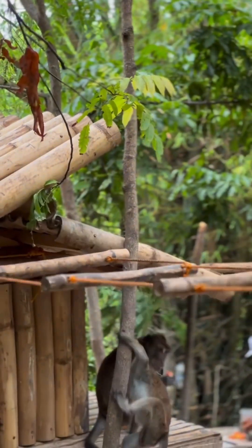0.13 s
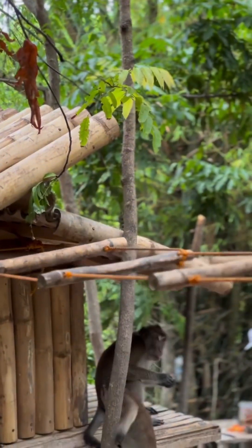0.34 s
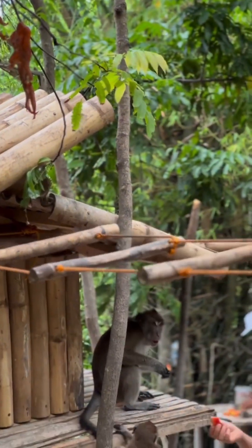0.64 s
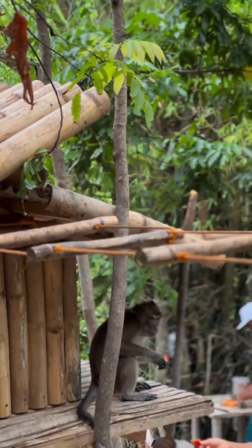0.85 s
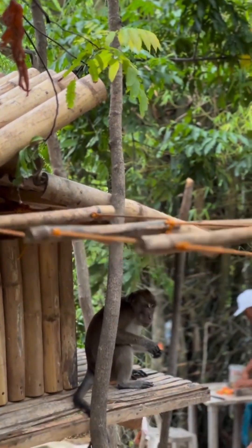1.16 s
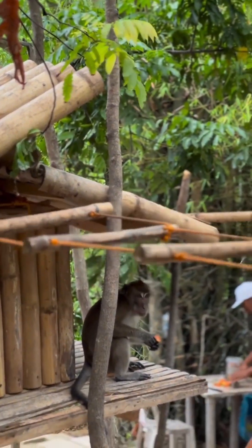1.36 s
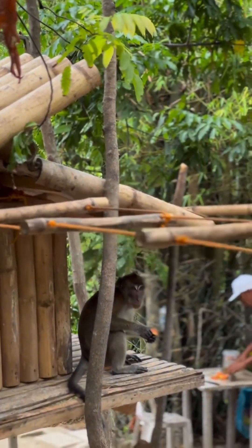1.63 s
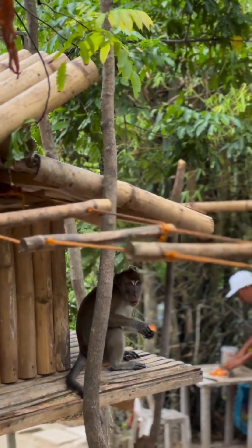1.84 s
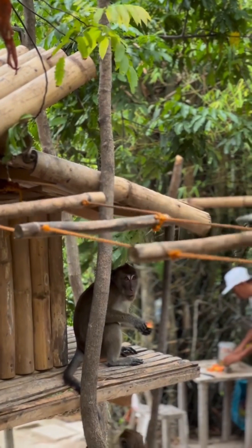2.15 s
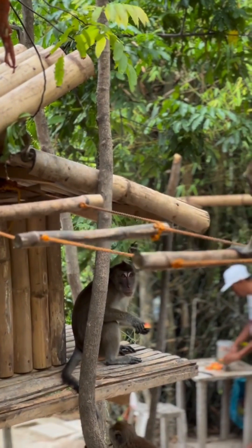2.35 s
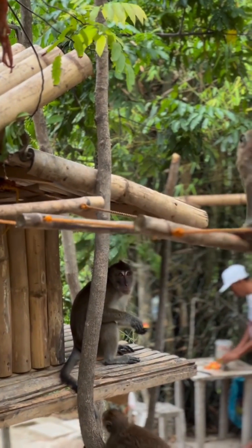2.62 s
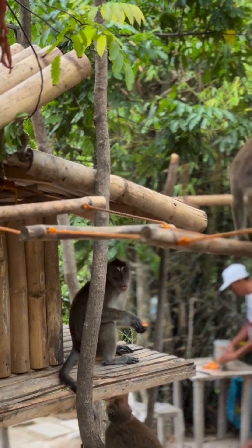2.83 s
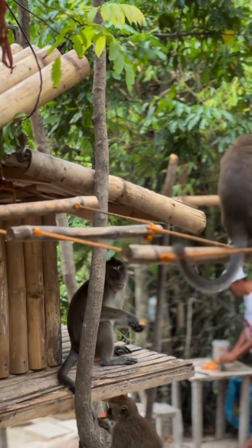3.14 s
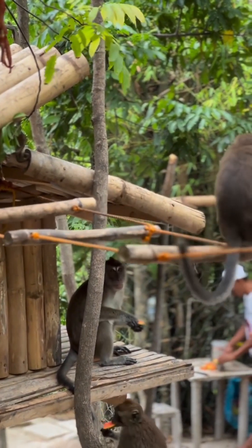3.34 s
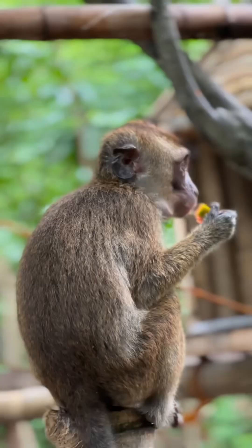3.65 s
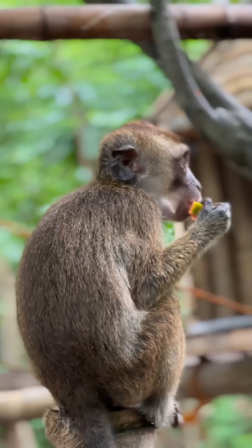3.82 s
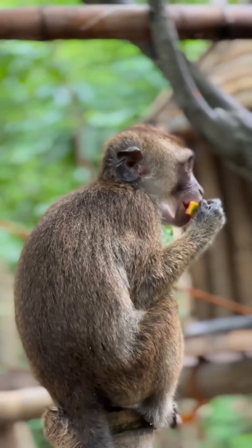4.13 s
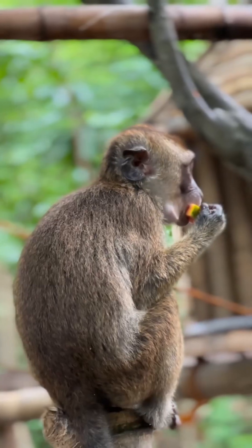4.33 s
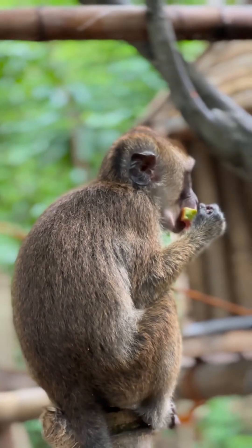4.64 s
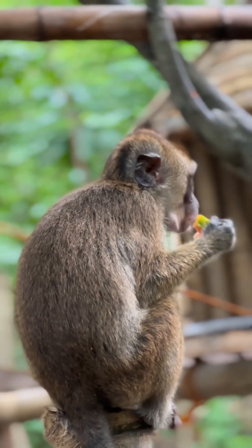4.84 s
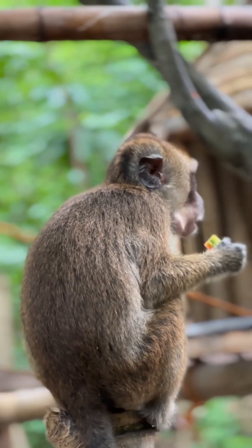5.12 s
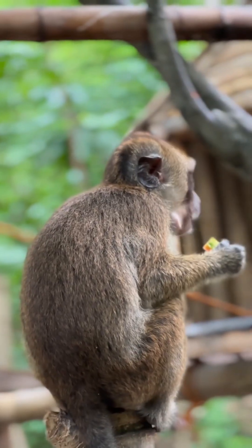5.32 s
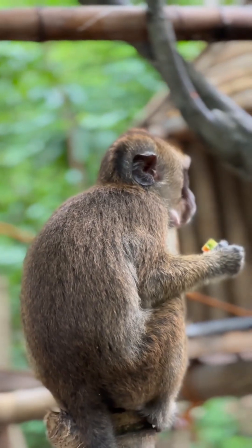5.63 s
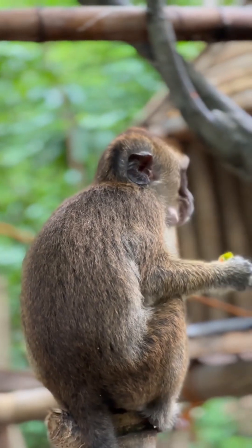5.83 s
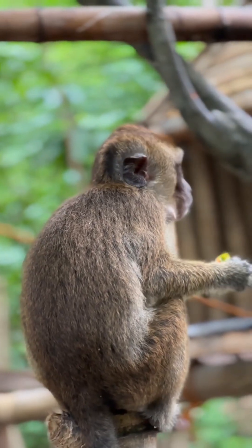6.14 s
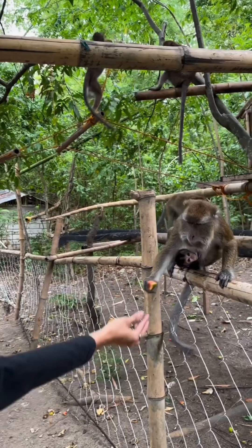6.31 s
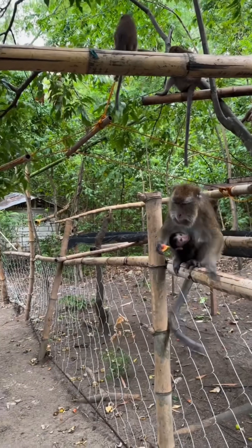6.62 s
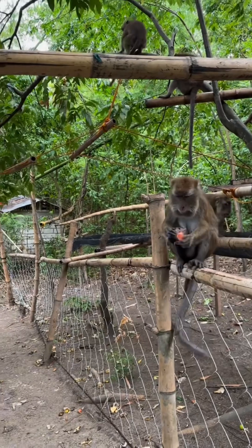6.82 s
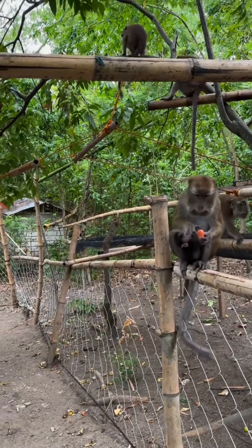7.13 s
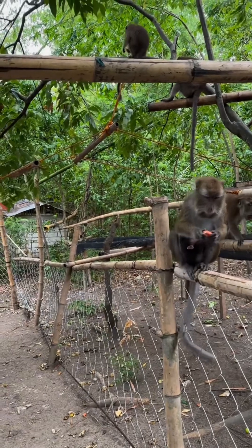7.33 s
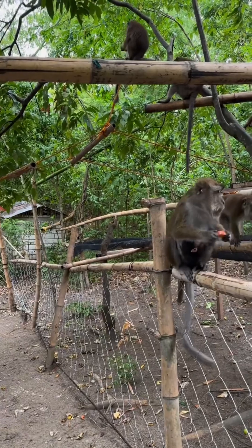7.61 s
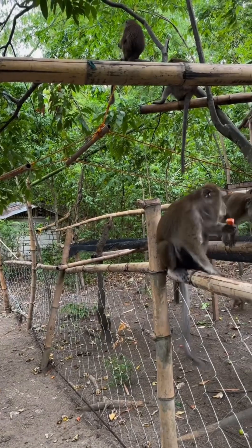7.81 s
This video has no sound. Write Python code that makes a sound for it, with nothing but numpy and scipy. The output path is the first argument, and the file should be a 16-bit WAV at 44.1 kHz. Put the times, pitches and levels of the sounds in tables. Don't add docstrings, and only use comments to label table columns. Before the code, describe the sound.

A near ape's long note is already sounding at the start and sinks away by 0.4 s, while a more distant partner holds a level note until 0.8. The near voice whoops upward at 1.3; the far one holds a higher, sagging note from 1.4 to 2, overlapped by a swelling near note at 1.7-2.2. Whoops then alternate: far at 2.3, near at 2.7 with a cracked top, far at 3.0, near and louder at 3.7, far at 4.4 and 5.2. A high near whoop at 6.3 breaks before a belted far answer at 6.6; another begins at 7.9. Diffuse forest echo trails everything. Thin whistles come near 0.8, 2.3 and 5.5, with falling bird slides around 5.3, 6.2 and 7.2. Soft knocks at 3.2, 4.0 and 4.3, leaf rustles at 4.3 and 5.1, and a short crunch at 7.8 are close, over faint hush, insects and wind.

```python
import sys
import numpy as np
from scipy import signal
from scipy.fft import rfft, irfft
from scipy.io import wavfile
from scipy.ndimage import uniform_filter1d

SR = 44100
rng = np.random.default_rng(int(sys.argv[2]) if len(sys.argv) > 2 else 0)


def attenuation_scalar(level_db):
    decades = np.asarray(level_db, float) / 20
    return 10 ** decades


def master(y):
    cut = np.clip(np.atleast_2d(y).T, -1, 1)
    pcm = np.round(cut * 32767)
    wavfile.write(sys.argv[1], SR, pcm.astype(np.int16))


N = 351477
LEAD = 28000


def evened(x):
    return x / np.sqrt(np.mean(x ** 2) + 1e-20)


def read(points, hz):
    f, value = np.transpose(points)
    return np.interp(np.log(hz + 1), np.log(f + 1), value)


def add(mix, s, sound):
    part = mix[LEAD + round(s * SR):][:len(sound)]
    part += sound[:len(part)]


def drift(size, hz):
    settle = 9000
    noise = rng.standard_normal(size + settle)
    return evened(signal.lfilter(*signal.butter(2, hz, fs=SR), noise)[settle:])


def band_noise(size, order, low_hz, high_hz):
    band = signal.butter(order, [low_hz, high_hz], "band", fs=SR, output="sos")
    return evened(signal.sosfilt(band, rng.standard_normal(size)))


def unroll(rows):
    s, *columns = np.transpose(rows)
    t = np.arange(s[0], s[-1], 1 / SR)
    return s[0], [uniform_filter1d(np.interp(t, s, c), size=501, mode="nearest") for c in columns]


def gusts(t):
    # time in seconds, level in dB, width in seconds.
    puffs = [(.47, -76.5, .025), (1.31, -84, 0.019), (1.901, -89, 0.13), (2.83, -79, 0.045),
             (3.2, -83, .03), (3.739, -81.5, 0.031), (3.969, -76, 0.038), (4.17, -75, 0.035),
             (4.34, -82, 0.052), (4.5, -83, 0.055), (4.87, -79, 0.051), (5.199, -78, 0.052),
             (5.65, -80, 0.065), (6.199, -81, 0.077), (6.34, -75, 0.03), (7.14, -86, 0.066),
             (7.5, -81, 0.085), (7.8, -79, .15)]
    calm_db = -98
    return attenuation_scalar(calm_db) + sum(attenuation_scalar(db) * np.exp(-((t - s) / width) ** 2) for s, db, width in puffs)


def floor():
    # frequency in Hz, hush density in dB per Hz.
    hush_spectrum = [(30, -24.5), (90, -18), (150, -13.5), (270, -7.5), (500, 1.5), (800, 8.5), (1500, 0),
                     (3100, -1), (5000, -6), (8500, -13), (10200, -15), (11200, -16), (15000, -20.5),
                     (16000, -23.5)]
    # insect centre in Hz, width in Hz, level in dB.
    insects = [(8100, 540, -84), (10700, 60, -100)]
    frames, hz = N // 256 + 5, np.fft.rfftfreq(1024, 1 / SR)
    real, imaginary, patches = rng.standard_normal((3, 513, frames))
    patches = uniform_filter1d(patches, size=14, axis=0)
    patches = evened(uniform_filter1d(patches, size=14, axis=1))
    z = (real + 1j * imaginary) * attenuation_scalar(read(hush_spectrum, hz)[:, None] + 1.4 * patches)
    hush = signal.istft(z, nperseg=1024, noverlap=768)[1][:N]
    out = attenuation_scalar(-67.5 + 3.5) * evened(hush)
    t = np.arange(N) / SR
    for centre_hz, width_hz, db in insects:
        swell = attenuation_scalar(db + 4.5 * drift(N, 1.3))
        out = out + swell * drift(N, width_hz) * np.cos(2 * np.pi * centre_hz * t)
    wind = band_noise(N, 3, 55, 135)
    return out + gusts(t) * attenuation_scalar(1.3 * drift(N, 8)) * wind


def whoop(rows, throat, jitter, breath_db, third_db, lift_db, chest_db):
    s, (hz, db, bright_db) = unroll(rows)
    size = len(hz)
    turns = 2 * np.pi * np.cumsum(hz * (1 + jitter * drift(size, 47))) / SR
    glide = abs(np.gradient(np.log2(hz))) * SR
    slack_db = -3.0 * np.minimum(glide, 4.0)
    voice = np.cos(turns)
    for k in range(2, 15):
        level_db = read(throat, k * hz) + bright_db + 3.0 * drift(size, 32)
        if k == 3:
            level_db += third_db + lift_db * np.minimum(glide, 9.0) * np.clip(k * hz / 1000 - 2.5, 0, 1)
        if k > 3:
            spared = np.exp(-((k * hz - 4250) / 300) ** 2)
            level_db += slack_db * np.clip(k * hz / 1000 - 1.9, 0, 1) * (1 - spared)
        voice = voice + attenuation_scalar(level_db) * np.cos(k * turns + k * k) * (k * hz < 12000)
    ring = drift(size, 120) * np.cos(2 * np.pi * 4150 * np.arange(size) / SR)
    breath = band_noise(size, 3, 2600, 6500) + .3 * ring
    chest = band_noise(size, 2, 300, 600)
    edges = signal.windows.tukey(size, min(1, 600 / size))
    total = voice + attenuation_scalar(breath_db + bright_db) * breath + attenuation_scalar(chest_db) * chest
    return s, np.sqrt(2) * attenuation_scalar(db) * edges * total


def held(rows, bright_db):
    s, hz, db = np.transpose(rows)
    return np.transpose([s, hz, db, bright_db + 0.34 * np.minimum(db.max() - db, 20)])


def sweep(start, length, low_hz, top_hz, peak_db, shape, mouth):
    bend, rounding, full_hz, first_db, release_at, last_db = shape
    shut_db, opens_hz, gain_db = mouth
    attack_s, attack_db = .013, -26.5
    u = np.linspace(0, 1, num=40)
    hz = low_hz * (top_hz / low_hz) ** (1 - (1 - u ** bend) ** rounding)
    loud_at = min(np.interp(full_hz, hz, u), release_at)
    times = [0, attack_s / length, loud_at, release_at, 1]
    db = np.interp(u, times, [first_db + attack_db, first_db, 0, 0, last_db])
    bright_db = shut_db + gain_db * np.maximum(np.log2(hz / opens_hz), 0)
    return np.transpose([start + u * length, hz, peak_db + db, bright_db])


def bounced(s, sound, delay_ms, share):
    gap = np.zeros(round(delay_ms * SR / 1000))
    direct, late = np.concatenate([sound, gap]), np.concatenate([gap, sound])
    return s - delay_ms / 2000, (direct + share * late) / np.hypot(1, share)


def near_ape():
    # start in seconds, length in seconds, start pitch in Hz, top pitch in Hz, peak in dB.
    whoops = [
        (1.305, 0.15, 669.4, 1044, -17),
        (2.717, 0.12, 699.2, 1164, -12),
        (3.658, .111, 754, 1273, -11.5),
        (6.336, 0.12, 800.5, 1385, -11.5),
        (7.92, 0.1, 805, 1398, -12.5),
    ]
    # time in seconds, pitch in Hz, level in dB.
    long_notes = [
        [(-.6, 922.5, -23), (-.1, 864.2, -21), (.028, 837, -19.5), (.126, 815, -17), (.17, 796, -20),
         (.39, 752.6, -24), (.41, 755, -34), (.44, 703, -35.5)],
        [(1.72, 640, -49.5), (1.742, 669, -25.5), (1.804, 736, -29), (1.832, 776.7, -14.5), (1.9, 851, -13),
         (1.936, 888, -8.5), (1.96, 890, -15.5), (2.132, 913.6, -13.5), (2.17, 916, -40)],
    ]
    long_bright_db = [-2.5, -3.5]
    # overtone frequency in Hz, level against the fundamental in dB.
    throat = [(1300, -25), (1800, -23.5), (2150, -25.5), (2400, -35), (2800, -44.5), (3500, -60.5),
              (3850, -51.5), (4150, -37.5), (4550, -55), (5600, -57), (7300, -55.5), (9000, -61.5),
              (10500, -77.5)]
    # bend of the climb, rounding at the top, pitch of full effort in Hz, level after attack
    # in dB under peak, share of length where it lets go, end level in dB under peak.
    plain = (2.5, 2.17, 850.5, -14.5, 0.9, -19.5)
    breaking = (2.04, 1.2, 840.5, -11, .86, -5)
    # brightness when shut in dB, pitch where it opens in Hz, gain above in dB per octave.
    mouth = (.5, 860, -2)
    # delay in ms, share.
    bounces = [(18.0, .45), (8.75, .4), (7.65, .5), (3.85, .55), (4.0, .85), (4.0, .25), (4.07, .5)]
    calls = []
    for i, row in enumerate(whoops):
        rows = sweep(*row, breaking if i else plain, mouth)
        calls.append(whoop(rows, throat, jitter=0.0065, breath_db=-53, third_db=-12,
                           lift_db=2.34, chest_db=-55.5))
    for note, bright_db in zip(long_notes, long_bright_db):
        calls.append(whoop(held(note, bright_db), throat, jitter=0.004, breath_db=-59.5, third_db=-4.5,
                           lift_db=0.5, chest_db=-68.5))
    out = np.zeros(LEAD + N)
    for call, bounce in zip(calls, bounces):
        add(out, *bounced(*call, *bounce))
    return out


def far_ape():
    # start in seconds, length in seconds, start pitch in Hz, top pitch in Hz, peak in dB.
    whoops = [
        (2.307, 0.17, 561.8, 860, -23.5),
        (2.987, .16, 535, 866, -25),
        (4.448, .132, 557.7, 986, -23),
        (5.222, .13, 557.4, 887, -25.5),
        (6.59, .12, 638.2, 1195, -20),
    ]
    # time in seconds, pitch in Hz, level in dB.
    long_notes = [
        [(.24, 515.6, -47.5), (.35, 672, -32), (.445, 733, -24), (.482, 736.7, -39.5), (.525, 735.2, -19),
         (.612, 736, -31), (.655, 731.2, -25), (.748, 719.3, -33), (.795, 501, -62)],
        [(1.41, 511, -57.5), (1.464, 607, -34.5), (1.528, 750, -26), (1.63, 793, -22.5), (1.69, 782, -36.5),
         (1.8, 762, -24.5), (1.9, 730, -25.5), (1.945, 711, -42), (2.0, 548, -61)],
    ]
    long_bright_db = [-4.5, -3.5]
    # overtone frequency in Hz, level against the fundamental in dB.
    throat = [(1250, -33), (1600, -23.5), (1850, -20.5), (2200, -32), (2450, -28.5), (2900, -44.5),
              (3500, -55.5), (4400, -41), (5200, -50), (6000, -49.5), (9500, -56), (11000, -75.5)]
    belted_throat = [(1250, -36), (1800, -30), (2350, -25), (2900, -48), (3550, -54), (4700, -60),
                     (6000, -72), (11000, -88)]
    # bend of the climb, rounding at the top, pitch of full effort in Hz, level after attack
    # in dB under peak, share of length where it lets go, end level in dB under peak.
    plain = (2.5, 1.8, 880, -17, 0.95, -21.5)
    belted = (2.5, 2, 1049, -18.5, 1.6, -20)
    # brightness when shut in dB, pitch where it opens in Hz, gain above in dB per octave.
    mouth = (-4.0, 860, 20)
    belted_mouth = (-3.5, 894, 55)
    # delay in ms, share.
    bounces = [(9.8, .45), (9.75, .55), (10.4, .6), (17.8, .55), (7.9, .45), (9.8, .2), (9.8, .2)]
    calls = []
    for row in whoops[:-1]:
        calls.append(whoop(sweep(*row, plain, mouth), throat, jitter=.003, breath_db=-51, third_db=5.5,
                           lift_db=-1.5, chest_db=-60.5))
    calls.append(whoop(sweep(*whoops[-1], belted, belted_mouth), belted_throat, jitter=0.0062,
                       breath_db=-64, third_db=-1.5, lift_db=2.0, chest_db=-60))
    for note, bright_db, third_db in zip(long_notes, long_bright_db, [1.5, -6]):
        calls.append(whoop(held(note, bright_db), throat, jitter=.003, breath_db=-54.5,
                           third_db=third_db, lift_db=0, chest_db=-70))
    out = np.zeros(LEAD + N)
    for call, bounce in zip(calls, bounces):
        add(out, *bounced(*call, *bounce))
    return out


def forest(x):
    # frequency in Hz, decay time t60 in seconds.
    decay = [(500, 0.47), (900, 0.8948), (1500, 0.72), (3000, 0.93), (6000, 1), (10000, 1)]
    # frequency in Hz, echo level in dB.
    strength = [(500, -8), (1000, -14), (2000, -5.5), (4000, 0), (8000, 1)]
    # frequency in Hz, level in dB.
    far_tail = [(500, -13), (1200, -20.5), (2500, -25), (6000, -27)]
    hz, t, z = signal.stft(rng.standard_normal(3 * SR), SR, nperseg=256)
    t60 = read(decay, hz)[:, None]
    tail = attenuation_scalar(read(far_tail, hz)[:, None] - 60 * t / (3.68 * t60))
    shape = (attenuation_scalar(-60 * t / t60) + tail) * np.clip(t / 0.023, 0, 1)
    shape = shape / np.sqrt(np.sum(shape ** 2, axis=1, keepdims=True) * 128)
    response = signal.istft(z * shape * attenuation_scalar(read(strength, hz))[:, None], SR, nperseg=256)[1]
    return signal.fftconvolve(x, response)[:len(x)]


def knocks():
    # time in seconds, peak in dB, pitch in Hz.
    hits = [
        (0.474, -71, 110),
        (3.202, -57, 250),
        (3.956, -50, 250),
        (4.339, -60, 554),
    ]
    out, t = np.zeros(LEAD + N), np.arange(16384) / SR - .005
    for s, db, knock_hz in hits:
        add(out, s, attenuation_scalar(db + 9.5) * np.exp(-(t / 0.0014) ** 2) * np.sin(2 * np.pi * knock_hz * t))
    return out[LEAD:]


def birds(notes, waver, waver_hz, flutter_db):
    out = np.zeros(LEAD + N)
    for rows in notes:
        s, (hz, db) = unroll(rows)
        turns = 2 * np.pi * np.cumsum(hz * (1 + waver * drift(len(hz), waver_hz))) / SR
        level = attenuation_scalar(db + flutter_db * drift(len(hz), 25))
        add(out, s, level * np.cos(turns) * signal.windows.tukey(len(hz), .2))
    return out


def whistles():
    # start in seconds, length in seconds, level in dB.
    calls = [
        (.77, 0.7, -68.5),
        (2.28, 0.44, -69.5),
        (5.5, 0.36, -66.5),
    ]
    from_hz, steady_hz, rise_s = 3000, 3140, 0.12
    notes = [[(s, from_hz, db - 17), (s + rise_s, steady_hz, db), (s + length, steady_hz, db - 11.5)]
             for s, length, db in calls]
    return birds(notes, 0.0083, 60, flutter_db=3.5)


def rustles():
    # time in seconds, level in dB, centre in Hz, width in octaves, decay time t60 in seconds.
    stirs = [
        (2.645, -65, 7800, 1.1, 0.31),
        (3.451, -69, 7166, 0.89, 0.65),
        (4.327, -57.5, 7700, 0.58, 0.3),
        (4.329, -55.5, 3040, 1.1, 0.27),
        (5.058, -60.5, 5630, 1.2, 0.62),
        (7.369, -70.5, 6000, 1, 0.22),
        (7.8, -55.5, 2060, 0.38, 0.077),
        (7.786, -67, 8940, 0.35, 0.44),
    ]
    out, t = np.zeros(LEAD + N), np.arange(16384) / SR
    hz = np.fft.rfftfreq(len(t), 1 / SR)
    for s, db, centre_hz, octaves, t60 in stirs:
        grains = rng.standard_normal(len(t)) * attenuation_scalar(5.2 * drift(len(t), 300))
        band = np.exp(-(np.log2((hz + 1) / centre_hz) / octaves) ** 2)
        hiss = evened(irfft(rfft(grains) * band))
        add(out, s, attenuation_scalar(db - 60 * t / t60) * np.minimum(t / (0.052 * t60), 1) * hiss)
    return out[LEAD:]


def voice_breaks():
    # start in seconds, length in seconds, pitch in Hz, level in dB, brightness in dB.
    jumps = [
        (2.829, 0.056, 1317, -30, -5.5),
        (3.761, .065, 1488, -22, -3),
        (6.444, 0.039, 1529, -26, -2),
    ]
    # overtone frequency in Hz, level against the fundamental in dB.
    throat = [(2700, -16.5), (3300, -23.5), (4200, -16), (4800, -31.5), (6300, -30), (7900, -35.5),
              (9500, -42), (11000, -60)]
    out = np.zeros(LEAD + N)
    for s, length, hz, db, bright_db in jumps:
        top_hz, late_db = hz * 1.07, bright_db + 6
        rows = [(s, hz, db, bright_db),
                (s + .5 * length, top_hz, db - 5, late_db),
                (s + length, top_hz, db - 21, late_db)]
        add(out, *whoop(rows, throat, jitter=0.014, breath_db=-36, third_db=-1.9, lift_db=0.5,
                        chest_db=-54.5))
    return out


def slides():
    # start in seconds, length in seconds, first pitch in Hz, last pitch in Hz, level in dB.
    glides = [
        (4.92, .22, 3900, 4100, -74),
        (5.31, .25, 7700, 4600, -69),
        (6.245, .21, 7800, 4200, -54),
        (6.88, .33, 4250, 4050, -70),
        (7.162, .2, 8100, 4500, -58),
    ]
    u = np.linspace(0, 1, num=20)
    notes = []
    for s, length, from_hz, to_hz, db in glides:
        hz = to_hz * (from_hz / to_hz) ** ((1 - u) ** 1.4)
        notes.append(np.transpose([s + u * length, hz, db - 3.2 - u]))
    return birds(notes, .022, 250, flutter_db=1.2)


def scene():
    song = near_ape() + far_ape() + voice_breaks()
    whistling, sliding = whistles(), slides()
    echo = forest(song + 2.2 * whistling + 1.24 * sliding)
    voices = song + 1.08 * whistling + 0.21 * sliding + echo
    return (voices[LEAD:] + knocks() + rustles() + floor())[None]


def low_pass(x):
    return signal.sosfilt(signal.butter(12, 15700, fs=SR, output="sos"), x)


def record(dry):
    no_offset = signal.butter(1, 40, "high", fs=SR, output="sos")
    bent = dry + 0.0044 * signal.sosfilt(no_offset, dry ** 2)
    top_band = signal.butter(6, [9350, 11000], "band", fs=SR, output="sos")
    top = signal.sosfiltfilt(top_band, bent)
    power_db = 10 * np.log10(abs(uniform_filter1d(dry ** 2, size=6000)) + 1e-12)
    kept = attenuation_scalar(-.35 * np.maximum(power_db + 44.5, 0))
    finished = bent - (1 - kept) * top
    return low_pass(finished)


dry = scene()
out = record(dry)
master(out)
```